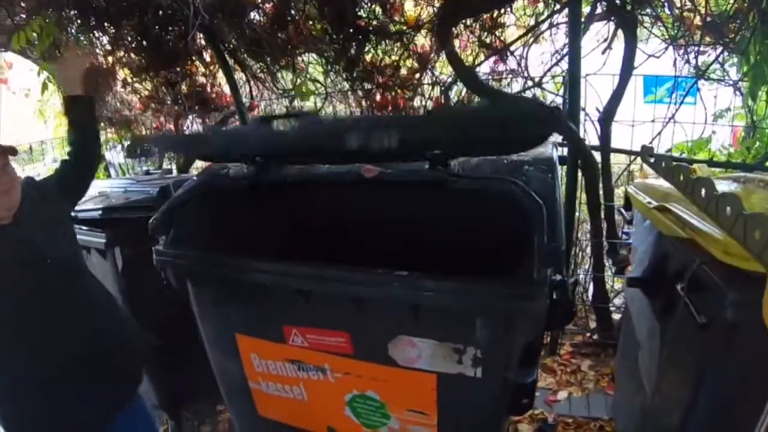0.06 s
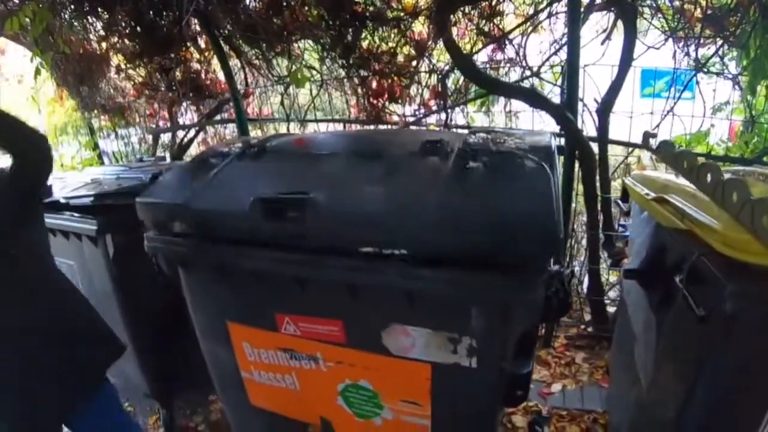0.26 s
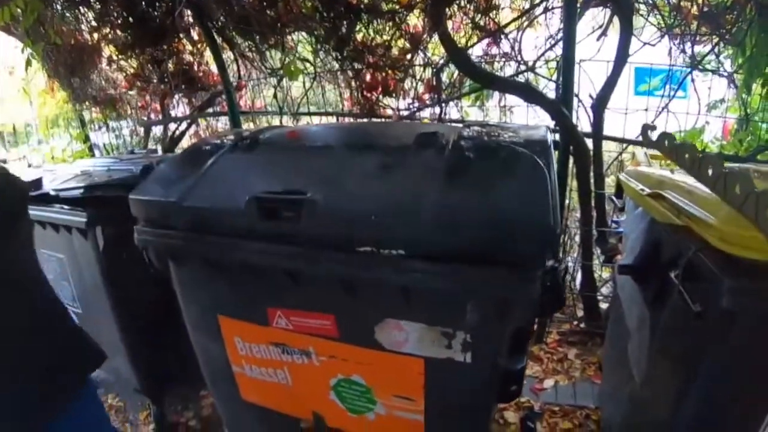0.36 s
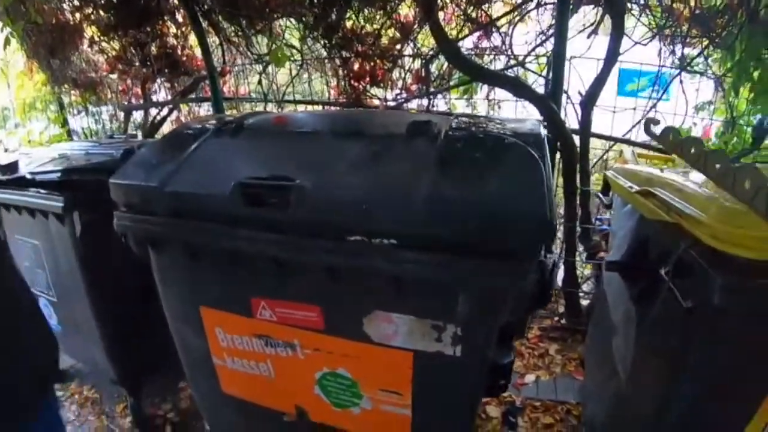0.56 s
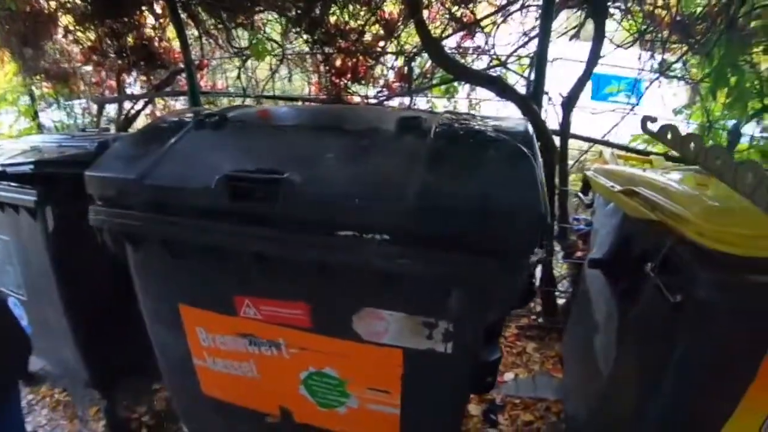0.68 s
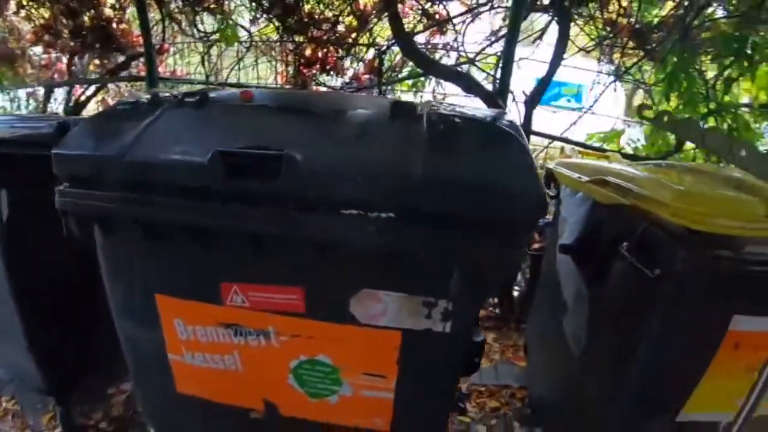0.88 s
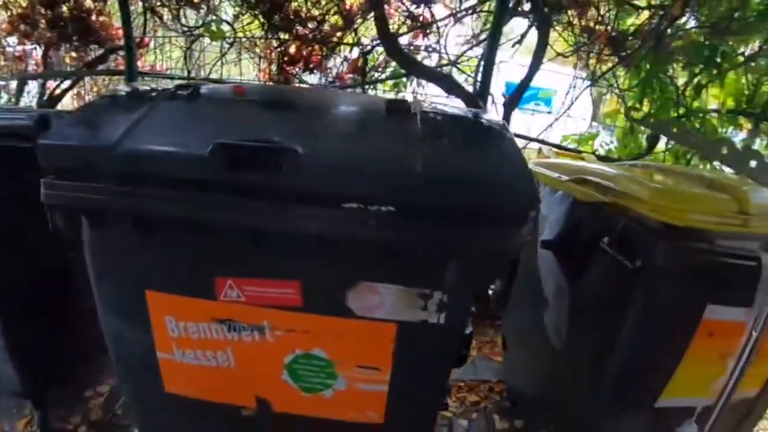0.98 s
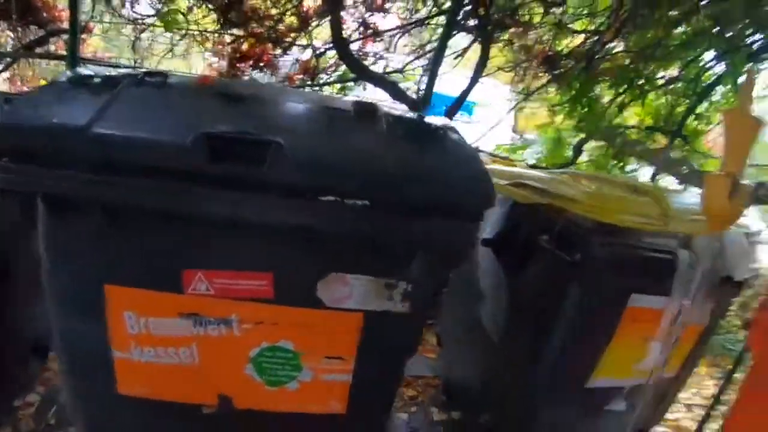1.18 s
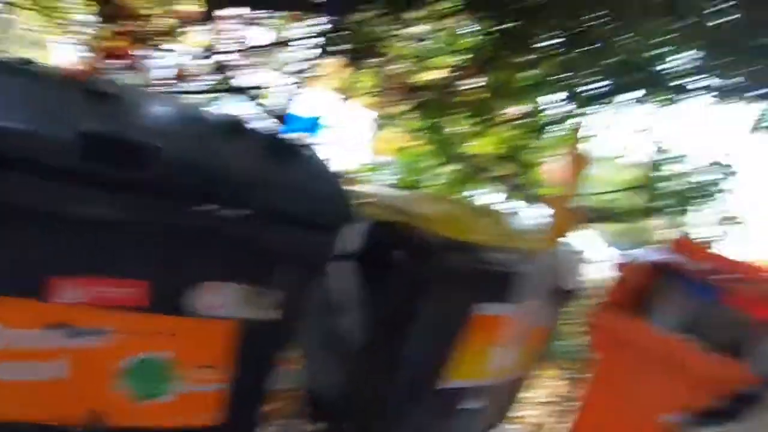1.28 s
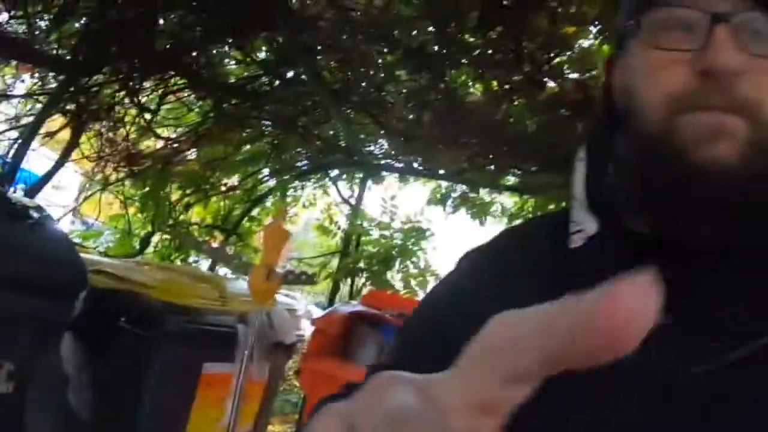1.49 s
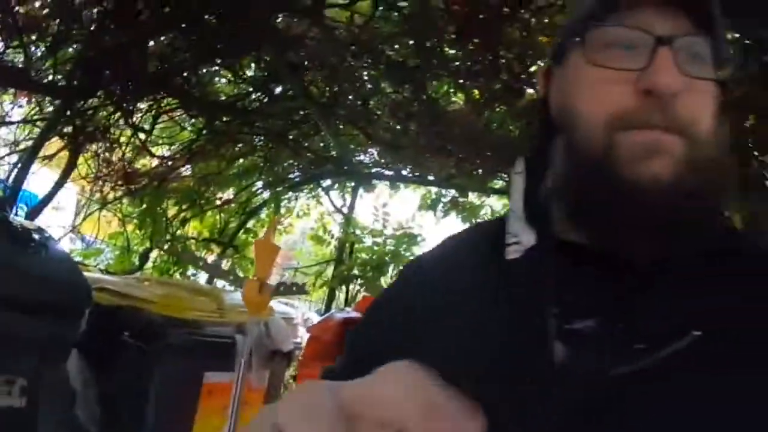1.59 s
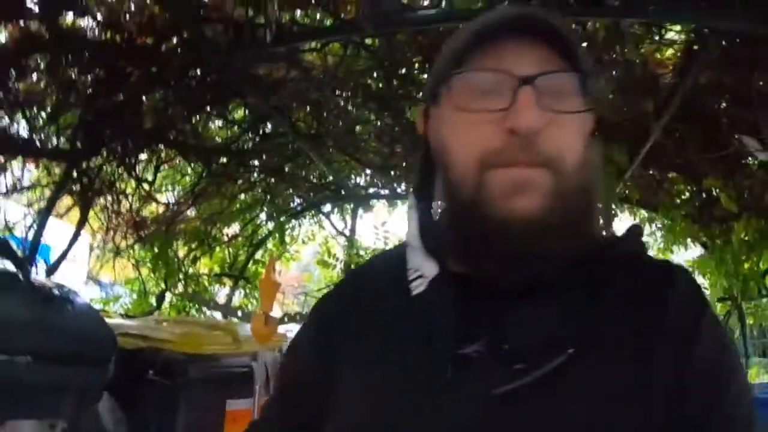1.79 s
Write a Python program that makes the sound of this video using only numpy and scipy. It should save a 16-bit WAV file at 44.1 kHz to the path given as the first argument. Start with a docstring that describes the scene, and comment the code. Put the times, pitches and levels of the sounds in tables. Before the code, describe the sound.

Big bin lid slamming with a hollow boom outdoors, followed by microphone rubbing and knocks.

```python
"""A wheeled bin's lid slams shut

The heavy plastic lid of a big bin swings shut under trees: its hinge ticks, the lid slams onto the rim,
the hollow body booms, and the lid bounces and rattles to rest. Then clothes and dry leaves rustle, and
a hand rubs and knocks on the microphone's housing while turning it round. Behind it all lies a faint
outdoor hiss, a little louder just before the slam."""
import sys
import numpy as np
from scipy import signal
from scipy.fft import rfft, irfft
from scipy.io import wavfile
from scipy.ndimage import uniform_filter1d

SR = 44100
rng = np.random.default_rng(int(sys.argv[2]) if len(sys.argv) > 2 else 0)


def unload_audio(sound):
    """Save the sound as a 16-bit wav file, at the path given as the first command line argument."""
    columns = np.transpose(np.atleast_2d(sound))
    # keep every value between -1 and 1, then stretch to whole-number steps
    steps = np.round(np.clip(columns, -1, 1) * 32767)
    wavfile.write(sys.argv[1], SR, steps.astype(np.int16))


N = 81585
TIME = np.arange(N) / SR
TREBLE_LIMIT_HZ = 16500
PORT_GAINS = np.array([[-0.67], [1]])  # the microphone's left opening swings against the right one


def lid():
    """Each blow on the rim cracks, claps the lid's panel, leaves a clatter and thumps the hollow body."""
    # the lid hits the rim and bounces:
    # (time [s], clatter [dB], crack [dB], clap [dB], thud [dB], treble cutoff [Hz])
    blows = [(0.1689, -35.5, -32, -22, -23, 6090), (.201, -32, -67, -43, -37, 4630),
             (0.2177, -40, -34, -11, -19, 1010), (0.2287, -22, -5.5, 5, -0.5, 12000),
             (0.2435, -27, -23, -41, -6, 3600), (0.32, -36.5, -34.5, -36, -11.5, 4000),
             (0.331, -39, -33.5, -45, -39, 12100), (.366, -38.5, -51, -42, -16, 12000),
             (0.3819, -28, -16.5, -8.5, -32, 5250), (0.3886, -27.5, -14.5, -36, -11.5, 7560),
             (0.399, -30.5, -29, -14, -26, 3980), (0.4077, -47, -21.5, -43, -25, 3140),
             (0.4156, -47, -22, -44, -7.5, 1800), (0.4334, -60, -27, -36, -36, 3000)]
    # tones of the lid's flat panel: (pitch [Hz], level [dB], time to fade by 60 dB [s])
    panel_tones = [(704, -10.5, 0.034), (800, -12.5, 0.022), (872, -17, .016), (1227.5, -26, 0.086),
                   (1670, -22.5, 0.035), (1909, -19, .032), (2464, -22, 0.047), (2900, -24.5, .04),
                   (3155, -28.5, 0.052), (4220, -31.5, .035)]
    # tones of the body and the air in it: (pitch [Hz], level [dB], time to fade by 60 dB [s])
    body_tones = [(52.7, -17, 0.76), (62.9, -18.5, 0.37), (87.3, -20, 0.27), (107, -28.5, 0.14),
                  (122.2, -20.5, 0.2), (140, -11.5, 0.056), (154.8, -23.5, .13), (191.6, -23.5, 0.28),
                  (213.4, -23, 0.15), (245, -31, 0.34), (277, -32.5, .25)]
    # tone colour of the short crack of contact: (frequency [Hz], relative level [dB])
    crack_colour = [(100, -26), (450, -16.5), (750, -1), (1200, 3.5), (1900, 0), (3000, -9), (4800, -13),
                    (6000, -21.5), (7300, -9.5), (8400, -34), (10000, -13), (12000, -31), (16000, -42)]
    # how alike the crack is on the left and right: (frequency [Hz], likeness [0 to 1])
    crack_likeness = [(300, .998), (700, 0.36), (2000, 0.3), (4500, 0.2), (8000, 0.46)]
    bass_cut = signal.butter(2, 520, "high", fs=SR, output="sos")  # the panel gives off little bass
    hits, thuds = 0, 0
    for start, clatter_db, crack_db, clap_db, thud_db, cutoff_hz in blows:
        crack = from_db(crack_db) * noise(crack_colour, crack_likeness) * decay(start, fade_s=0.036)
        clap = signal.sosfilt(bass_cut, ring(click(start, clap_db), panel_tones))
        blow = from_db(clatter_db) * clatter(start) + crack + clap
        hits += soften(blow, cutoff_hz)
        thuds += click(start, thud_db)
    boom = soften(ring(thuds, body_tones), cutoff_hz=378)
    return hits * pan(-1.6) + boom


def clatter(start):
    """Struck plastic rings with countless close tones; each octave dies away at its own rate."""
    # tone colour of the ringing plastic: (frequency [Hz], relative level [dB])
    colour = [(60, -29.5), (130, 3), (270, 5.5), (340, -4), (430, -6), (620, 4), (1200, -5), (2000, -7.5),
              (3200, -9), (5500, -15.5), (7300, -11.5), (10000, -14.5), (12000, -27), (16000, -44)]
    # how long the plastic rings: (frequency [Hz], time to fade by 60 dB [s])
    fade_times = [(60, .7), (250, 0.597), (500, 0.26), (1500, .29), (4000, 0.22), (6000, 0.16),
                  (10000, .26)]
    spectrum = rfft(noise(colour))
    hz = np.arange(N // 2 + 1) * SR / N
    octaves_hz = np.geomspace(60, 15360, 9)
    out = 0
    for centre_hz, only_this_octave in zip(octaves_hz, np.eye(len(octaves_hz))):
        band_gain = at_hz(np.c_[octaves_hz, only_this_octave], hz)
        band = irfft(spectrum * band_gain, N)
        out += band * decay(start, at_hz(fade_times, centre_hz))
    return out


def bin_rumble():
    """The bin rumbles, swelling with the air that the lid pushes out."""
    # rise and fall of the rumble: (time [s], level [dB])
    loudness = [(0, -62), (.12, -57), (.16, -44), (.2, -42), (.24, -31), (.4, -33), (.5, -39), (.62, -44),
                (.8, -51), (.95, -70)]
    # tone colour of the rumble: (frequency [Hz], relative level [dB])
    colour = [(18, -22), (32, 2), (54, -1.5), (80, 1), (130, -9.5), (260, -16), (400, -28.5)]
    return level(loudness) * noise(colour)


def hinge():
    """The pivots grind and give bright ticks with a short ring as the lid swings down."""
    # ticks of the hinge: (time [s], level [dB])
    ticks = [(0.1067, -28.5), (0.1607, -35.5)]
    # tone colour of a tick: (frequency [Hz], relative level [dB])
    tick_colour = [(500, -16.5), (1200, -8), (2000, -0.5), (3000, 1), (3700, -8), (4700, 2), (5800, -13.5),
                   (7200, 8), (8300, -13), (9500, -0.5), (11000, -19.5), (13000, -14.5), (16000, -31)]
    # the pivots grind as the swing starts: (peak time [s], half length [s], level [dB])
    grinds = [(.042, 0.023, -49), (.12, 0.072, -55)]
    # tone colour of the grinding: (frequency [Hz], relative level [dB])
    grind_colour = [(100, -5), (220, 3), (400, -2), (900, -8), (1500, -9), (2500, -24.5), (5000, -32.5)]
    tick_gain = 0
    for start, db in ticks:
        tail = from_db(-9) * decay(start, fade_s=0.19)
        tick_gain += from_db(db) * (decay(start, fade_s=0.027) + tail)
    ticking = tick_gain * noise(tick_colour) * pan(-2.4)
    grinding = swells(grinds) * noise(grind_colour) * grain(depth_db=6.0)
    return ticking + grinding


def housing_ring(push, pitch_ratio=1.0):
    """A push rocks the microphone's housing sideways, so it rings briefly with little bass."""
    # tones of the rocking housing: (pitch [Hz], level [dB], time to fade by 60 dB [s])
    tones = [(1289, 3.5, .033), (1153, -17, 0.0072), (1630, -23, 0.013)]
    tuned = [(hz * pitch_ratio, db, fade_s) for hz, db, fade_s in tones]
    bass_cut = signal.butter(1, 594, "high", fs=SR, output="sos")
    return signal.sosfilt(bass_cut, ring(push, tuned))


def finger_knocks():
    """Each knock on the housing gives a sharp snap, a short ring and a low bump."""
    # fingers strike the housing:
    # (time [s], ring [dB], snap [dB], bump [dB], treble cutoff [Hz], ring pitch [ratio])
    knocks = [(1.1922, -20.5, -46, -75, 3450, .91), (1.2437, -9.5, -10, -24.5, 11900, 1.0),
              (1.3112, -26.5, -30, -41, 1510, 1.0), (1.354, -21.5, -35, -31.5, 1970, 1.0),
              (1.448, -37, -37, -68, 8000, 1.0)]
    # tones of the low bump: (pitch [Hz], level [dB], time to fade by 60 dB [s])
    bump_tones = [(101, -7, 0.041), (179, -2.5, .03), (345, -7.5, 0.017)]
    # tone colour of the snap: (frequency [Hz], relative level [dB])
    snap_colour = [(300, 2.5), (1000, 2), (2000, -7), (3000, -1.5), (4000, -6.5), (5500, -0.5), (7500, -7),
                   (10000, -8), (12000, -17), (16000, -24)]
    out = 0
    for start, ring_db, snap_db, bump_db, cutoff_hz, pitch_ratio in knocks:
        rocking = PORT_GAINS * housing_ring(click(start, ring_db), pitch_ratio)
        snap_gain = from_db(snap_db) * decay(start, fade_s=0.0036, rise_s=0.0001)
        snap = snap_gain * noise(snap_colour, likeness=[(100, 0.078), (10000, 0.041)]) * pan(-8)
        bump = ring(click(start, bump_db), bump_tones)
        out += soften(snap + rocking + bump, cutoff_hz)
    return out


def finger_rub():
    """Sliding fingers hiss on the housing and keep it ringing."""
    # rise and fall of the rubbing: (time [s], level [dB])
    loudness = [(.75, -93.5), (.95, -58), (1.08, -60.5), (1.17, -68.5), (1.19, -45.5), (1.208, -53.5),
                (1.228, -39.5), (1.242, -42), (1.262, -46.5), (1.29, -55.5), (1.32, -50), (1.355, -43.5),
                (1.378, -55), (1.405, -48), (1.435, -49.5), (1.455, -73), (1.55, -67.5), (1.85, -70)]
    # tone colour of the hiss: (frequency [Hz], relative level [dB])
    colour = [(60, -1), (200, 0), (400, 4), (700, -15), (1600, 0.5), (2350, 3), (3300, -4), (5000, -2),
              (7000, 0), (10000, -9.5), (12000, -21.5), (16000, -35.5)]
    # how alike the hiss is on the left and right: (frequency [Hz], likeness [0 to 1])
    likeness = [(100, .1), (5000, 0.17), (8000, .55)]
    ringing = from_db(7) * unit_level(housing_ring(rng.standard_normal(N)))
    hiss = noise(colour, likeness) * grain(depth_db=1.0) * pan(-4.2)
    return level(loudness) * (hiss + PORT_GAINS * ringing)


def hand_jolts():
    """The moving hand jolts the microphone, making deep, soft thumps."""
    # jolts of the hand: (time [s], level [dB])
    jolts = [(0.964, -31), (1.05, -53.5), (1.159, -42.5), (1.269, -33.5), (1.383, -40), (1.512, -47.5)]
    # tone colour of a jolt: (frequency [Hz], relative level [dB])
    colour = [(15, 3), (32, 9.5), (55, -1), (90, -12), (210, -15), (400, -36), (800, -63)]
    # how alike a jolt is on the left and right: (frequency [Hz], likeness [0 to 1])
    likeness = [(30, 0.52), (200, 0.11)]
    gain = sum(from_db(db) * decay(start, fade_s=0.42, rise_s=0.01) for start, db in jolts)
    return gain * noise(colour, likeness)


def hiss_and_rustle():
    """A faint hiss rises just before the slam; after it, clothes and dry leaves rustle and twigs snap."""
    # the first two rows are background hiss, the rest are clothes and leaves:
    # (peak time [s], half length [s], level [dB])
    rises = [(.042, 0.032, -54), (.09, 0.017, -56.5), (.752, 0.008, -51.5), (.782, .012, -51.5),
             (.81, 0.013, -47.5), (.86, .06, -57), (.997, 0.011, -51), (1.055, 0.013, -55.5),
             (1.41, 0.017, -48.5), (1.5, 0.0088, -55), (1.63, 0.007, -66), (1.715, 0.005, -55),
             (1.78, 0.022, -53), (1.822, 0.025, -49)]
    # tone colour of both hiss and rustle: (frequency [Hz], relative level [dB])
    colour = [(150, -45), (300, -1.5), (500, -5), (900, -12.5), (1500, 1.5), (2500, -1.5), (4000, -4),
              (5500, -7), (7300, -6), (10000, -16.5), (12000, -30), (16000, -45)]
    # small snaps of leaves and twigs: (time [s], level [dB])
    snaps = [(0.806, -42), (0.841, -44), (0.879, -45.5), (0.959, -44.5), (0.987, -46), (1.155, -45.5),
             (1.447, -43), (1.466, -42.5), (1.74, -47.5), (1.770, -48), (1.829, -57)]
    # tone colour of a snapping twig: (frequency [Hz], relative level [dB])
    twig_colour = [(200, 3), (600, -16), (1400, 0), (2400, 4), (3600, -3.5), (6000, -14.5), (10000, -34),
                   (14000, -32)]
    snap_gain = sum(from_db(db) * decay(start, fade_s=0.052) for start, db in snaps)
    snapping = snap_gain * noise(twig_colour) * grain(depth_db=2.5)
    grainy_noise = swells(rises) * grain(depth_db=3.5) * noise(colour)
    return (grainy_noise + snapping) * pan(-2.5)


def outdoor_air():
    """A faint, steady hush lies behind everything."""
    # tone colour of the outdoor background: (frequency [Hz], relative level [dB])
    colour = [(15, 0), (30, 2.5), (60, -10), (90, -23), (140, -5.5), (230, -8), (450, -24.5), (800, -20.5),
              (1300, -19.5), (2500, -21.5), (5000, -28.5), (7300, -27.5), (10000, -33.5), (12000, -44),
              (16000, -72)]
    return from_db(-54.5) * noise(colour)


def from_db(db):
    """Turn decibels into a gain, the number a signal is multiplied by."""
    return 10 ** (np.asarray(db) / 20)


def unit_level(x):
    """Scale a signal so that its average power is 1."""
    return x / np.sqrt(np.mean(x ** 2) + 1e-20)


def at_hz(points, hz):
    """Read between (frequency, value) points, with every octave equally wide."""
    frequencies, values = np.transpose(points)
    return np.interp(np.log(np.maximum(hz, 1)), np.log(frequencies), values)


def level(points):
    """A gain that follows (time [s], level [dB]) points."""
    return from_db(np.interp(TIME, *np.transpose(points)))


def pan(db):
    """Left and right gains that are db apart; below zero moves the sound to the right."""
    return from_db(np.array([[db], [-db]]) / 2)


def noise(colour, likeness=None):
    """Stereo noise of a given tone colour, falling away beyond both ends of the colour's table."""
    # how alike left and right are for most sounds here: (frequency [Hz], likeness [0 to 1])
    usual_likeness = [(100, 0.97), (280, 1), (600, 0.57), (1500, 1), (4000, 0.81), (6000, .7), (9000, .88)]
    hz = np.arange(N // 2 + 1) * SR / N + 1e-9
    alike = np.clip(at_hz(usual_likeness if likeness is None else likeness, hz), -1, 1)
    shared, opposed = rfft(rng.standard_normal((2, N)))
    stereo = np.sqrt(1 + alike) * shared + np.sqrt(1 - alike) * opposed * [[1], [-1]]
    low_hz, high_hz = colour[0][0] / 2, 2 * colour[-1][0]
    edge_fade = 1 / (1 + (hz / high_hz) ** 4) / (1 + (low_hz / hz) ** 2)
    return unit_level(irfft(stereo * from_db(at_hz(colour, hz)) * edge_fade, N))


def decay(start, fade_s, rise_s=0.00066):
    """The gain of a hit: a quick rise, then a fall of 60 dB every fade_s seconds."""
    age = np.maximum(TIME - start, 0)
    return np.minimum(age / rise_s, 1) * from_db(-np.minimum(60 * age / fade_s, 200))


def ring(push, tones):
    """A push sets fading tones ringing; a click of size 1 starts each at its listed level."""
    out = 0
    for hz, db, fade_s in tones:
        shrink = from_db(-60 / (fade_s * SR))  # per sample
        angle = 2 * np.pi * hz / SR
        feedback = [1, -2 * shrink * np.cos(angle), shrink * shrink]
        out += signal.lfilter([0, from_db(db) * np.sin(angle)], feedback, push + 1e-18)
    return out


def click(start, db):
    """A push that lasts one sample."""
    return from_db(db) * (np.arange(N) == int(start * SR))


def soften(x, cutoff_hz):
    """A softer contact loses its treble."""
    treble_cut = signal.butter(2, min(cutoff_hz, TREBLE_LIMIT_HZ), fs=SR, output="sos")
    return signal.sosfilt(treble_cut, x + 1e-18)


def swells(rows):
    """A gain made of bell-shaped swells whose powers add up."""
    power = sum(from_db(2 * db) * np.exp(-((TIME - peak) / half) ** 2) for peak, half, db in rows)
    return np.sqrt(power)


def grain(depth_db, slip_s=0.0012):
    """The fast, uneven gain of many tiny slips."""
    flicker = uniform_filter1d(rng.standard_normal(N), int(slip_s * SR))
    return unit_level(from_db(depth_db * unit_level(flicker)))


def scene():
    """The bin, the hand on the microphone and the surroundings, added together in stereo."""
    closing_bin = lid() + bin_rumble() + hinge()
    handling = finger_knocks() + finger_rub() + hand_jolts()
    return closing_bin + handling + hiss_and_rustle() + outdoor_air()


def record(dry):
    """Round off the loudest peaks, then cut the deepest bass and the highest treble."""
    rounded = dry / (1 + dry ** 6) ** (1 / 6)
    bass_cut = signal.butter(1, 14, "high", fs=SR, output="sos")
    treble_cut = signal.cheby2(12, 70, TREBLE_LIMIT_HZ, fs=SR, output="sos")
    return signal.sosfilt(treble_cut, signal.sosfilt(bass_cut, rounded))


dry = scene()
out = record(dry)
unload_audio(out)
```